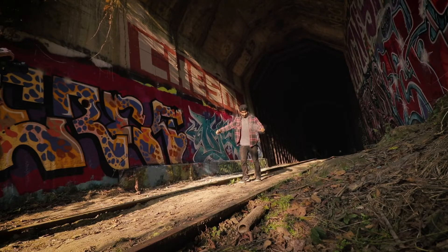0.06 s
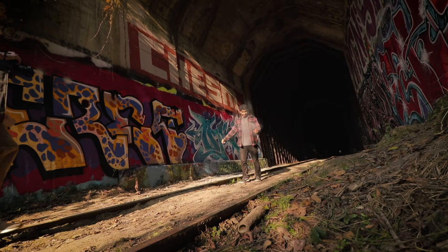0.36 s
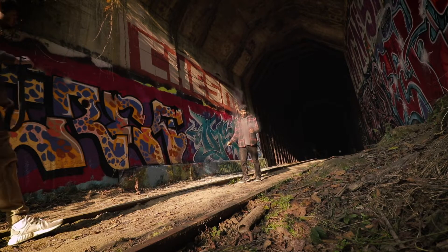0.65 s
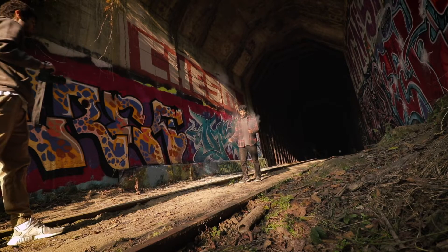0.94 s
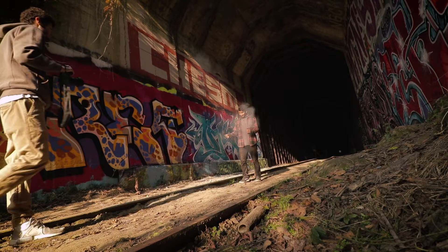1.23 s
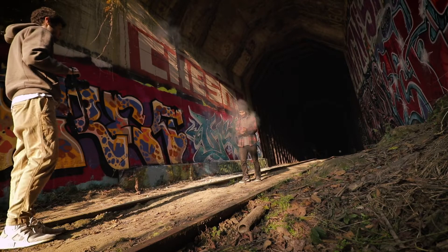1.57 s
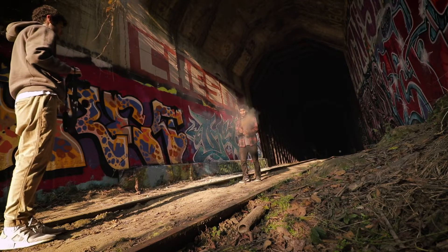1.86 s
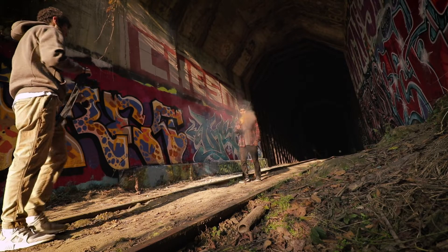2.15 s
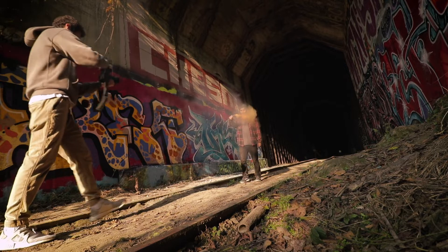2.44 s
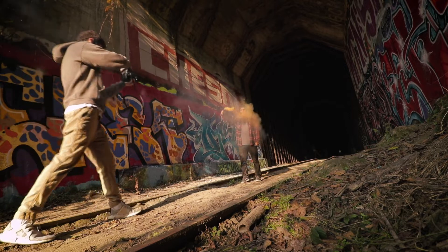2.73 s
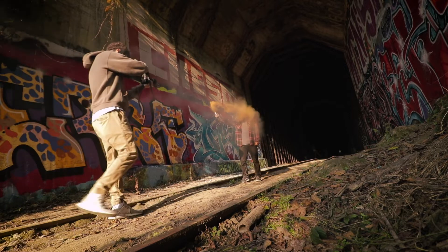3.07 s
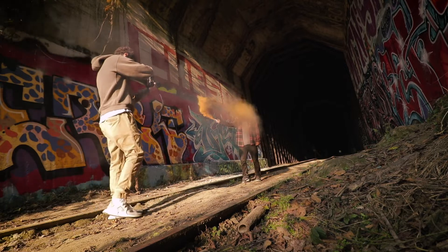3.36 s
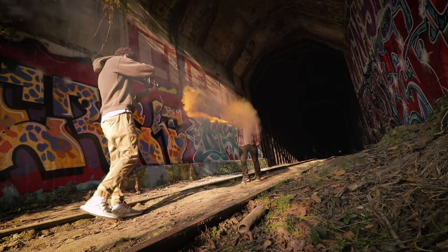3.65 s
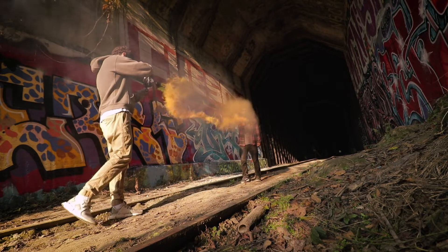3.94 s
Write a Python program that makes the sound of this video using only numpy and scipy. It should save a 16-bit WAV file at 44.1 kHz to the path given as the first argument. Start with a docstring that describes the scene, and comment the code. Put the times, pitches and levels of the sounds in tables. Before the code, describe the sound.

A smoke bomb hisses throughout with a hollow, slowly swirling rush and fine sputter. It dips around 0.5 seconds, brightens from 1 second and spits sharply at 1.5. The hiss sinks between 2 and 3 seconds, then returns in quick surges with small spits from 3.5. Soft steps land on dirt near 1.5, 2.8, 3.3 and 3.8 seconds. The tunnel echoes and rumbles faintly underneath.

```python
"""At the mouth of a concrete tunnel a hand-held smoke bomb burns. Gas rushes hollowly through the
canister's resonances; the nozzle's bright jet surges and sags, with fine sputter and small spits,
one of them sharp. Close reflections shift as things move, so the hiss phases slowly. Someone takes
a few soft steps on dirt; the tunnel rumbles faintly and echoes. Nearly mono."""
import sys
import numpy as np
from scipy import signal
from scipy.fft import rfft, irfft
from scipy.io import wavfile
from scipy.ndimage import uniform_filter1d, map_coordinates

SR = 44100
rng = np.random.default_rng(int(sys.argv[2]) if len(sys.argv) > 2 else 0)


def put_to_file(sound):
    """Save the sound as 16-bit audio at rate SR, in the file named by the first command-line argument."""
    columns = np.atleast_2d(sound).T  # one column per channel
    safe = np.clip(columns, -1, 1)
    whole_steps = np.round(safe * 32767)
    wavfile.write(sys.argv[1], SR, whole_steps.astype(np.int16))


N = 176400
TIME_S, FREQS_HZ = np.arange(N) / SR, np.arange(N // 2 + 1) * SR / N
RUSH_SPUTTER_DB, JET_SPUTTER_DB = -8, -20
JET_NEAR_DB = -4.5


def rush(flutter, gain_db=-2, flutter_db=.5):
    """Burning gas excites the broad resonances of the canister."""
    # Each row: centre in Hz, width in Hz, gain in dB.
    resonances = [(1312, 620, -1.5), (1733, 1200, 0.5), (2530, 476, 2), (2967, 540, -3.5)]
    # Each row: time in seconds, relative level in dB.
    level_db = [(0, -24.5), (.15, -25), (.3, -25.5), (.55, -30), (.78, -28), (.93, -26), (1.03, -26.5),
                (1.08, -29), (1.2, -27.5), (1.28, -28), (1.36, -26.5), (1.45, -29), (1.55, -29.5),
                (1.66, -26.5), (1.95, -27.5), (2.04, -28), (2.12, -32.5), (2.38, -35), (2.6, -33),
                (2.78, -33.5), (3.1, -34.5), (3.2, -30.5), (3.45, -29.5), (3.53, -31), (3.6, -24.5),
                (3.72, -31), (3.81, -24.5), (3.89, -33), (3.96, -28), (4, -31)]
    gas, body = burning(RUSH_SPUTTER_DB), 0
    for k, (hz, width_hz, db) in enumerate(resonances):
        radius = np.exp(-np.pi * width_hz / SR)
        feedback = [1, -2 * radius * np.cos(2 * np.pi * hz / SR), radius ** 2]
        ring = (1 - radius ** 2) * signal.lfilter([1, 0, -1], feedback, gas)
        body += (-1) ** k * from_db(db) * ring
    body = cut(cut(body, 960, "high"), 3980, "low")
    return phased(body, near_db=-6) * envelope(level_db) * from_db(gain_db + flutter_db * flutter)


def hollow_ring():
    """The canister mouth rings in a narrow band whose centre wanders slightly."""
    # Each row: time in seconds, centre in Hz.
    centre_hz = [(0, 1906), (.27, 2043), (.55, 1825), (1.0, 1938), (1.7, 1785), (2.9, 1930), (3.5, 1817),
                 (4, 1698)]
    # Each row: time in seconds, level in dB.
    level_db = [(0, -30.5), (.27, -27.5), (.5, -32.5), (.7, -31), (.87, -29.5), (1.01, -28.5),
                (1.09, -32.5), (1.35, -31), (1.55, -32.5), (1.8, -29.5), (1.98, -33.5), (2.1, -38.5),
                (2.45, -42), (2.7, -36.5), (2.92, -33), (3.1, -39), (3.5, -35.5), (3.85, -34.5), (4, -28.5)]
    return phased(gliding(centre_hz, width_hz=400), near_db=-52) * envelope(level_db)


def jet(flutter, gain_db=7.5, flutter_db=.62, wander_db=.67):
    """Nozzle hiss, brighter when it blows harder; its colour wanders as the canister is moved about."""
    # Each row: time in seconds, relative level in dB.
    level_db = [(0, -39), (.07, -47), (.17, -59), (.33, -53), (.45, -56), (.68, -52.5), (.82, -48.5),
                (.87, -42), (.94, -40), (1.0, -42), (1.11, -48), (1.15, -40), (1.27, -40), (1.33, -36),
                (1.51, -38), (1.56, -42.5), (1.66, -36.5), (1.8, -39), (1.93, -35), (2.03, -39.5),
                (2.1, -44.5), (2.35, -48.5), (2.76, -42.5), (3.13, -45), (3.38, -42), (3.54, -43.5),
                (3.61, -37), (3.72, -42), (3.81, -33), (3.89, -37.5), (3.96, -33.5), (4, -34.5)]
    # Each row: frequency in Hz, relative density in dB.
    spectrum = [(1200, -34), (2200, 14), (2900, -1.5), (3700, 4.5), (4400, 4.5), (5200, 4.5), (6100, 2),
                (7300, 1), (8500, -1), (9500, -8), (10800, -14), (12800, -12.5), (15800, -24)]
    # A gliding resonance. Each row: time in seconds, centre in Hz.
    whoosh_hz = [(0, 5250), (1.9, 5200), (2.3, 4850), (2.55, 4150), (2.9, 3980), (3.3, 4020), (3.75, 4400),
                 (4, 4500)]
    # Each row: time in seconds, level against the hiss in dB.
    whoosh_db = [(0, -16), (1.3, -14.5), (1.95, -20), (2.35, -12), (3.2, -11), (3.7, -16), (4, -17)]
    gas, centres_hz = rfft(burning(JET_SPUTTER_DB)), np.geomspace(2000, 15000, 14)
    force, hiss = envelope(level_db), 0
    for hz, share in zip(centres_hz, np.eye(len(centres_hz))):
        strip = irfft(gas * np.interp(FREQS_HZ, centres_hz, share), N)
        octaves_up = max(np.log2(hz / 5600), 0)
        brightening = (force / force.mean()) ** (.25 * octaves_up)
        hiss += strip * from_db(wander_db * drift(rate_hz=4.8)) * brightening
    hiss = phased(colour(hiss, spectrum), JET_NEAR_DB)
    whoosh = envelope(whoosh_db) * gliding(whoosh_hz, width_hz=340)
    return (hiss + whoosh) * force * from_db(gain_db + flutter_db * flutter)


def sizzle():
    """Thin, high edge of the jet at the nozzle."""
    # Each row: time in seconds, level in dB.
    level_db = [(0, -46.5), (.3, -47), (.45, -56), (.78, -69), (.92, -46), (1.08, -71), (1.18, -46),
                (1.55, -56), (1.8, -41.5), (2.2, -70), (2.8, -49), (3.5, -74), (3.8, -34), (4, -49)]
    edge = band(burning(JET_SPUTTER_DB), hz=8310, width_hz=1130)
    return phased(edge, JET_NEAR_DB) * envelope(level_db)


def roar(gain_db=8.5):
    """Dull turbulence of the plume."""
    # Each row: frequency in Hz, relative density in dB.
    spectrum = [(50, -57), (130, -6), (250, -0.5), (360, -2.5), (700, -2), (1100, 1.5), (2500, 5),
                (5000, -13), (15000, -28.5)]
    # Each row: time in seconds, relative level in dB.
    level_db = [(0, -33.5), (.1, -35.5), (.18, -38.5), (.33, -39.5), (.65, -45), (1.1, -46.5), (1.4, -42.5),
                (1.9, -43.5), (2.3, -49), (2.8, -44), (3.1, -47.5), (3.7, -44.5), (3.86, -43), (4, -41.5)]
    return colour(burning(RUSH_SPUTTER_DB), spectrum) * envelope(level_db) * from_db(gain_db)


def spits():
    """The nozzle spits, most sharply at 1.5 s."""
    # Each row: start in seconds, level in dB, centre in Hz, width in Hz, decay in seconds.
    pops = [(.729, -39, 7800, 5920, 0.00072), (.77, -44, 10000, 5000, .001),
            (.805, -31.5, 8340, 2200, 0.00045), (.83, -41, 11000, 6000, .001),
            (1.383, -31, 10400, 6000, 0.001), (1.404, -31, 5950, 7940, .01),
            (1.453, -37, 7000, 8000, 0.0044), (1.482, -30, 5200, 2600, 0.023),
            (1.495, -23, 2800, 4000, 0.025), (1.502, -16, 5340, 1490, 0.00084),
            (1.506, -17.5, 4200, 2200, 0.0012), (1.507, -20, 1680, 2800, 0.0053),
            (2.034, -31, 6500, 4000, 0.00074), (2.11, -32, 5470, 3995, .001),
            (2.925, -35, 1904, 1200, 0.0027), (3.196, -32, 2200, 2000, .002),
            (3.562, -25, 2070, 1397, 0.0027), (3.596, -32, 2100, 1986, .005),
            (3.785, -25, 2200, 2500, .002), (3.849, -20, 1710, 2166, 0.0027)]
    return bursts(pops)


def steps(low_hz=120):
    """Shoes land on dirt; the landings carry no deep bass."""
    # Each row: start in seconds, level in dB, centre in Hz, width in Hz, decay in seconds.
    landings = [(.088, -36, 200, 160, .02), (1.517, -24, 720, 1700, .006), (2.76, -28, 1500, 1500, .007),
                (2.812, -41, 380, 400, .012), (3.302, -33, 220, 250, .011), (3.843, -35, 950, 600, .05),
                (3.88, -38, 850, 450, .06)]
    return cut(bursts(landings), low_hz, "high")


def boom():
    """A low resonance of the tunnel."""
    # Each row: time in seconds, level in dB.
    level_db = [(0, -49), (.6, -52), (1.3, -53), (1.9, -49.5), (2.3, -61), (4, -63)]
    return unit_power(band(rng.standard_normal(N), hz=249, width_hz=43)) * envelope(level_db)


def phased(x, near_db, near_top_hz=5400, ground_db=-14, wall_db=-15, window_s=.1):
    """Three moving reflections comb the sound; its power is held near one."""
    # Closest, ground and wall reflections. Each row: time in seconds, lag in ms.
    near_lag_ms = [(0, .54), (.25, .49), (.55, .54), (1.2, .555), (1.75, .605), (2.05, .65), (2.3, .705),
                   (2.55, .795), (2.8, .845), (3.1, .81), (3.5, .725), (4, .655)]
    ground_lag_ms = [(0, 3.9), (1.3, 4.0), (1.8, 4.1), (2.4, 4.15), (2.7, 4.32), (3.0, 4.5), (3.4, 4.68),
                     (3.65, 4.58), (4, 4.3)]
    wall_lag_ms = [(0, 9.05), (.4, 8.6), (.8, 8.35), (1.3, 8.25), (1.65, 7.85), (1.95, 7.77), (2.3, 7.95),
                   (2.7, 7.6), (3.3, 5.95), (4, 6.8)]
    dull = irfft(rfft(x) / (1 + (FREQS_HZ / near_top_hz) ** 4), N)
    combed = x + from_db(near_db) * delayed(dull, near_lag_ms)
    combed += from_db(ground_db) * delayed(x, ground_lag_ms)
    combed += from_db(wall_db) * delayed(x, wall_lag_ms)
    return combed / np.sqrt(uniform_filter1d(combed ** 2, int(window_s * SR)) + 1e-12)


def tunnel(x, t60_s=1.45, tail_db=-19):
    """Echoes off the ground and near walls, then a dull tail from the depth."""
    # Each row: delay in seconds, gain in dB.
    echoes = [(.0035, -40), (0.0097, -14.5), (0.0195, -22), (0.033, -24), (0.047, -16.5)]
    near = sum(from_db(db) * np.interp(TIME_S - lag_s, TIME_S, x, left=0) for lag_s, db in echoes)
    tail = cut(rng.standard_normal(N), 3340, "low") * from_db(-60 * TIME_S / t60_s)
    far = signal.fftconvolve(x, tail / np.linalg.norm(tail))[:N]
    return x + cut(near, 8000, "low") + from_db(tail_db) * far


def tunnel_air(level_db=-53):
    """The tunnel's air rumbles steadily."""
    # Each row: frequency in Hz, relative density in dB.
    spectrum = [(25, -43), (45, -26), (75, -9.5), (120, 3), (160, 4), (250, -19), (360, -8), (900, -9),
                (4000, -43), (15000, -37)]
    return from_db(level_db) * colour(rng.standard_normal(N), spectrum)


def side_noise(level_db=-61.5):
    """Faint noise that sets left and right slightly apart."""
    # Each row: frequency in Hz, relative density in dB.
    spectrum = [(30, -8), (120, 15), (500, 14), (900, 3.5), (2500, -31), (5000, -14.5), (9000, -0.5),
                (15000, 9.5)]
    return from_db(level_db) * colour(rng.standard_normal(N), spectrum)


def burning(sputter_db, pops_per_s=300, spread_db=5.7):
    """Smooth turbulence with tiny pops of uneven size in it."""
    sizes = from_db(spread_db * np.minimum(rng.exponential(1, N), 4))
    pops = sizes * rng.choice([-1, 1], N) * (rng.random(N) < pops_per_s / SR)
    return rng.standard_normal(N) + from_db(sputter_db) * unit_power(pops)


def gliding(centre_hz, width_hz):
    """Turbulence in a resonance whose centre moves; unit power."""
    swirl = cut(rng.standard_normal((2, N)), width_hz / 2, "low", order=3)
    phase = 2 * np.pi * np.cumsum(curve(centre_hz)) / SR
    return unit_power(swirl[0] * np.cos(phase) + swirl[1] * np.sin(phase))


def bursts(rows, attack_s=.0011):
    """Short decaying noises, each in its own band."""
    out = np.zeros(N)
    for start_s, db, hz, width_hz, decay_s in rows:
        age_s = np.maximum(TIME_S - start_s, 0)
        shape = (1 - np.exp(-age_s / attack_s)) * np.exp(-np.minimum(age_s / decay_s, 50))
        noise = unit_power(band(rng.standard_normal(N), hz, width_hz))
        out += from_db(db) * shape / shape.max() * noise
    return out


def drift(rate_hz):
    """Random wander with spread 1."""
    slow = irfft(rfft(rng.standard_normal(N)) / (1 + (FREQS_HZ / rate_hz) ** 2), N)
    return unit_power(slow - slow.mean())


def delayed(x, lag_ms):
    """Read x late by a moving lag."""
    return map_coordinates(x, [np.arange(N) - curve(lag_ms) * SR / 1000], order=3, mode="nearest")


def colour(x, spectrum):
    """Shape x by a spectrum; unit power."""
    hz, db = np.transpose(spectrum)
    gain = from_db(np.interp(np.log(FREQS_HZ + 1), np.log(hz), db))
    return unit_power(irfft(rfft(x) * gain, N))


def band(x, hz, width_hz):
    """Steep-sided resonance."""
    low_hz = np.sqrt(hz ** 2 + width_hz ** 2 / 4) - width_hz / 2
    return cut(x, [low_hz, low_hz + width_hz], "band")


def cut(x, hz, kind, order=2):
    """Low-, high- or band-pass."""
    return signal.sosfilt(signal.butter(order, np.minimum(hz, .45 * SR), kind, fs=SR, output="sos"), x)


def curve(rows):
    """Join (seconds, value) rows by straight lines."""
    return np.interp(TIME_S, *np.transpose(rows))


def envelope(level_db):
    """Gain over time from (seconds, dB) rows."""
    return from_db(curve(level_db))


def from_db(db):
    """Decibels to gain."""
    return 10 ** (np.asarray(db) / 20)


def unit_power(x):
    """Scale to an RMS of one."""
    return x / np.sqrt(np.mean(x ** 2) + 1e-20)


def scene():
    """Smoke bomb and steps in the tunnel, over its air; rush and jet flutter together."""
    flutter = drift(rate_hz=31)
    bomb = rush(flutter) + hollow_ring() + jet(flutter) + sizzle() + roar()
    mid = tunnel(bomb + boom() + spits() + steps()) + tunnel_air()
    side = side_noise()
    return np.array([mid + side, mid - side])


def record(dry):
    """The top is cut steeply."""
    cutoff_hz = 15850
    return irfft(rfft(dry) / np.sqrt(1 + (FREQS_HZ / cutoff_hz) ** 400), N)


dry = scene()
out = record(dry)
put_to_file(out)
```